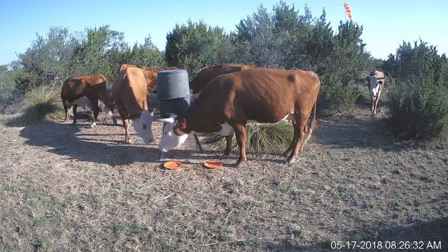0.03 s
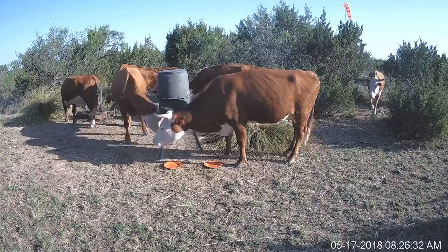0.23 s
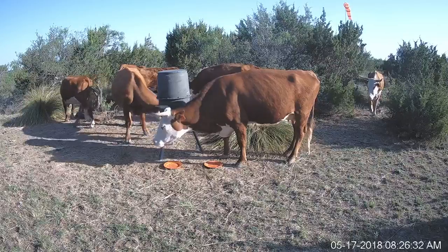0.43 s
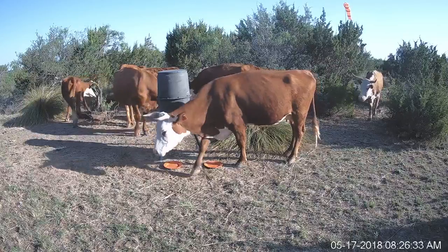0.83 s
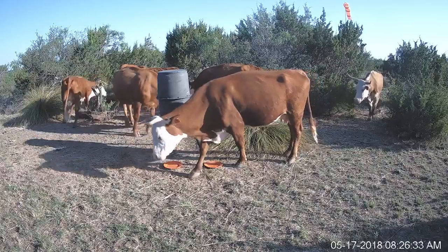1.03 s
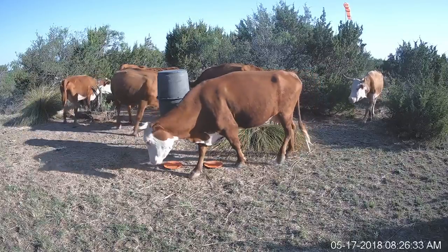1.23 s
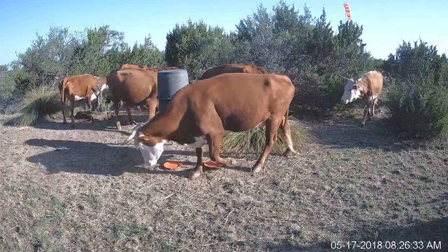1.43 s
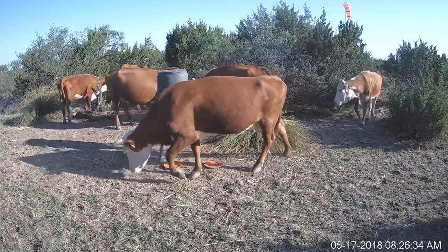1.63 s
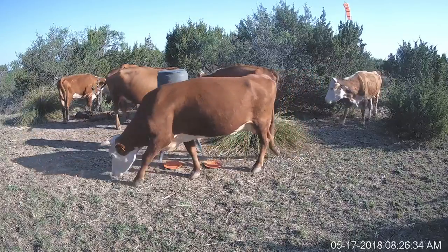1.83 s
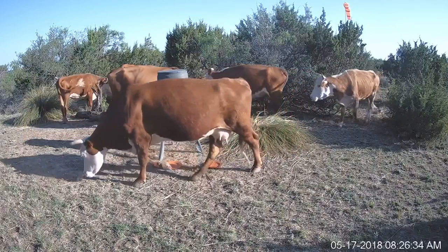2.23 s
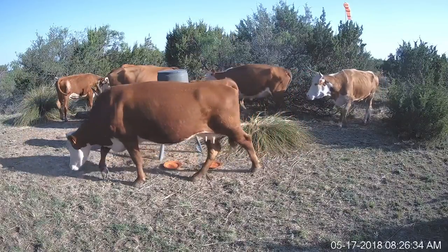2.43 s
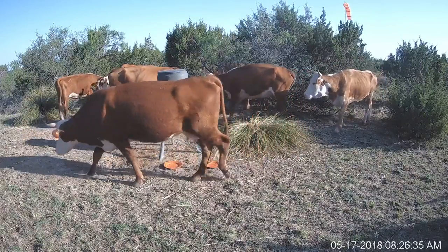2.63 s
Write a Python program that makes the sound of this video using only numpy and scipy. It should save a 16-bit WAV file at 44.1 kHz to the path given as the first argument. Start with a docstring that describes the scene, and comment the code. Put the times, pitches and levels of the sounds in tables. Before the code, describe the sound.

Repeated high bird whistles outdoors, with cattle stepping on stones and dry grass.

```python
"""A small bird repeats an arched whistle from the scrub round a dry pasture; the bushes scatter it back.
Fainter chirps come from deeper in. Cattle shift about close by: hooves knock on stones, thud on the soil
and drag through dry litter, and stalks tick. Under it, quiet open air and the hiss of a mono microphone."""
import sys
import numpy as np
from scipy import signal
from scipy.fft import rfft, irfft, next_fast_len
from scipy.io import wavfile
from scipy.ndimage import uniform_filter1d

SR = 44100
rng = np.random.default_rng(int(sys.argv[2]) if len(sys.argv) > 2 else 0)


def wav_record(signal):
    """Record a signal, one row per channel, as 16-bit PCM in the file named by sys.argv[1]."""
    frames = np.transpose(np.atleast_2d(signal))
    bounded = np.clip(frames, -1, 1)
    # unit amplitude maps onto the largest positive 16-bit level
    quanta = np.round(bounded * 32767).astype(np.int16)
    wavfile.write(sys.argv[1], SR, quanta)


N = 123479
T = np.arange(N) / SR

# spectra of air with hiss, stalk ticks and dragged litter (frequency [Hz], relative level [dB])
AIR_SPECTRUM = [(25, 1), (60, 2.5), (100, 5), (200, -8), (400, -6), (800, -5), (1500, -6), (3000, -4),
                (4200, -4), (5200, -9.5), (5850, -7.5), (6500, -15), (10000, -17.5), (16000, -18)]
STALK_SPECTRUM = [(1000, -19), (3000, -8), (5500, 4), (7500, -10), (16000, -20)]
SOIL_SPECTRUM = [(30, 3.5), (120, 1.5), (300, 2), (600, 1.5), (1000, -2.5), (2500, -55), (16000, -78)]
GRIT_SPECTRUM = [(100, -32), (600, -14), (1300, 0), (2000, 1), (3000, -7.5), (3900, -14), (4700, -4),
                 (5800, -7), (6800, -16), (16000, -41)]
GRASS_SPECTRUM = [(300, -19), (2000, -1.5), (3800, 8), (5500, 0), (7500, -8), (10000, -17), (16000, -24)]
# hoof drags (time of peak pressure [s], rise [s], fall [s], soil [dB], grit [dB], grass [dB])
HOOF_DRAGS = [(0.149, 0.061, 0.022, -63.5, -67, -44.5), (.05, 0.062, 0.076, -64, -62, -66),
              (.29, 0.15, 0.19, -64, -65, -68), (.45, 0.077, 0.036, -58, -60, -75),
              (.865, 0.053, 0.082, -60.5, -62, -57.5), (1.04, 0.039, 0.033, -61, -58, -58),
              (1.24, 0.25, 0.18, -56.5, -52.5, -63), (1.39, 0.12, 0.1, -52, -52, -62.5),
              (1.57, 0.14, 0.28, -62.5, -64.5, -78), (1.78, 0.028, 0.02, -64.5, -57, -54.5),
              (1.847, 0.043, 0.068, -62.5, -61, -58.5), (2.2, 0.12, 0.14, -57, -57, -57),
              (2.32, 0.079, 0.12, -55, -59.5, -61.5), (2.57, 0.091, 0.11, -74, -62, -61),
              (2.674, 0.011, 0.029, -63, -53.5, -58), (2.78, 0.055, .08, -61, -61.5, -85)]
# distant chirps (start [s], length [s], first pitch [Hz], last pitch [Hz], level [dB])
FAR_CHIRPS = [(0.033, 0.041, 4030, 3980, -61), (0.17, 0.053, 4160, 4030, -58),
              (0.37, 0.018, 4020, 3750, -61), (0.467, 0.026, 3250, 2740, -57),
              (.735, 0.036, 3070, 2770, -56.5), (2.356, 0.053, 3040, 2880, -57.5),
              (2.692, 0.044, 2470, 2500, -61.5), (2.681, 0.042, 4420, 4440, -63.5)]
# hoof knocks and snapping twigs (time [s], level [dB], pitch [Hz], T60 [s], relative snap level [dB])
HOOF_KNOCKS = [(.0430, -35, 1180, 0.0037, -20), (0.0932, -46, 1590, 0.0021, -3),
               (0.1374, -39, 1010, 0.0097, -4.5), (0.2195, -40.5, 1700, 0.0034, -15),
               (0.4407, -32.5, 750, 0.0059, -22), (0.4502, -16.5, 1620, 0.0023, -39),
               (0.4823, -32, 1200, 0.0011, -18), (0.552, -51, 6000, 0.0015, -12),
               (0.5926, -40.5, 1470, 0.0027, -9), (0.6402, -35.5, 1360, 0.0061, -13),
               (0.667, -39.5, 1350, 0.0054, -18), (0.6794, -34.5, 1820, 0.0083, -6.5),
               (0.697, -43, 1920, 0.0027, -7), (0.7125, -28, 1490, 0.0012, -16),
               (.7510, -34, 3300, 0.0029, 2), (0.766, -47, 3020, .002, -8),
               (0.861, -29.5, 1690, 0.0035, -11), (0.9372, -16.5, 1255, 0.0043, -11),
               (1.2025, -31.5, 2320, 0.0044, -7), (1.2715, -35, 2130, 0.01, -25),
               (1.4942, -27, 1339, 0.0025, -30), (1.577, -38.5, 1780, 0.0017, -11),
               (1.6004, -35.5, 1520, 0.0032, -16), (1.776, -44.5, 1480, 0.0043, -3),
               (1.7958, -38, 1400, 0.0064, -15), (1.951, -44, 5060, 0.0035, -13),
               (1.970, -44, 6160, 0.0012, -11), (2.1411, -25, 1450, 0.0016, -18),
               (2.3155, -36, 3036, 0.004, -6), (2.458, -43, 6495, .003, 0), (2.672, -43.5, 1330, 0.0055, 2)]
# heavy footfalls (time [s], level [dB], pitch [Hz], T60 [s])
HOOF_THUDS = [(0.153, -40, 559, 0.046), (0.4818, -42, 377, 0.027), (.638, -45, 655, 0.012),
              (.8620, -37, 341, .045), (.866, -50, 84.7, 0.05), (1.203, -44.5, 610, 0.013),
              (1.535, -48.5, 203.5, 0.032), (1.660, -48.5, 106, 0.045), (2.217, -45, 280, 0.054),
              (2.220, -47, 136, 0.049), (2.757, -51.5, 302, 0.044), (2.779, -52.5, 330, 0.053)]
# opening warble (time [s], pitch [Hz], level [dB])
OPENING_WARBLE = [(.176, 3030, -60), (.185, 3320, -49), (.195, 3514, -42), (.205, 3357, -45),
                  (.213, 2846, -46), (.222, 3098, -47.5), (.230, 3368, -43), (.242, 3090, -44),
                  (.253, 3190, -48), (.263, 3506, -41), (.273, 2810, -55)]
# arched whistles (start [s], length [s], level [dB], top pitch [Hz], relative echo level [dB])
WHISTLES = [(0.83, 0.071, -38.5, 3543, -18), (1.401, 0.085, -41.5, 3539, -17),
            (1.91, .079, -42.5, 3444, -7), (2.423, 0.077, -39.5, 3467, -3.5)]
# shape of one whistle (position [share of length], pitch [ratio to top], relative level [dB])
WHISTLE_SHAPE = [(0, .86, -9.5), (.15, .84, -3.5), (.31, .895, -1), (0.45, 0.98, -6.5), (.62, 1, -10.5),
                 (.76, 1, -2.5), (.885, 0.75, -3), (1, 0.64, -5)]

SCRUB_T60_S, CUTOFF_HZ = 0.19, 15850


def amp(db):
    """Decibels to gain."""
    return 10 ** (np.asarray(db) / 20)


def unit(x):
    """Scale to rms 1."""
    return x / np.sqrt(np.mean(x ** 2))


def add(out, start_s, x):
    """Mix x into out at start_s."""
    i = int(round(start_s * SR))
    out[i:i + len(x)] += x[:max(N - i, 0)]


def decay(t, t60_s):
    """Exponential fall, 60 dB in t60_s."""
    return np.exp(-np.log(1000) * t / t60_s)


def bandpass(x, low_hz, high_hz, order=2):
    """Butterworth band-pass."""
    return signal.lfilter(*signal.butter(order, [low_hz, high_hz], "band", fs=SR), x)


def colour(x, spectrum):
    """Filter x by a spectrum; rms 1."""
    hz, db = np.array(spectrum).T
    size = next_fast_len(N, True)
    bin_hz = np.maximum(np.fft.rfftfreq(size, 1 / SR), 1)
    gain = amp(np.interp(np.log(bin_hz), np.log(hz), db))
    return unit(irfft(rfft(x, size) * gain)[:N])


def wander(rate_hz):
    """Smooth random curve; rms 1."""
    hold = int(SR / rate_hz)
    steps = np.repeat(rng.standard_normal(N // hold + 1), hold)
    return unit(uniform_filter1d(uniform_filter1d(steps, hold), hold)[:N])


def flicker(x, depth_db, rate_hz=45):
    """Each half octave from bass to upper treble wavers in level on its own."""
    octave = np.log2(np.maximum(np.fft.rfftfreq(N, 1 / SR), 1) / 60)
    spectrum, out = rfft(x), x.copy()
    for centre in np.arange(15) / 2:
        band = irfft(spectrum * np.maximum(1 - 2 * np.abs(octave - centre), 0), N)
        out += band * (amp(depth_db * wander(rate_hz)) - 1)
    return out


def tail(x, t60_s, build_s):
    """Diffuse reflections that build up and die away."""
    t = T[:SR]
    response = rng.standard_normal(SR) * decay(t, t60_s) * (1 - np.exp(-(t / build_s) ** 2))
    return signal.fftconvolve(x, response / np.linalg.norm(response))[:N]


def air(level_db=-59, swell_db=0.5):
    """Outdoor hush and microphone hiss, wavering slightly."""
    hush = flicker(colour(rng.standard_normal(N), AIR_SPECTRUM), depth_db=2.14)
    return hush * amp(level_db + swell_db * wander(11.98))


def stalks(level_db=-72, ticks_per_s=70, spread_db=3.5):
    """Dry stalks tick at random under the herd."""
    hits = rng.random(N) < ticks_per_s / SR
    ticks = hits * amp(spread_db * np.minimum(rng.exponential(size=N), 3))
    return amp(level_db) * colour(tail(ticks, t60_s=0.02, build_s=0.00066), STALK_SPECTRUM)


def drags(grains_per_s=4000, spread_db=3.5, jitter_db=1.24):
    """Dragging hooves crush soil, grit and dry grass: dense grains that follow the pressure."""
    out = np.zeros(N)
    for k, spectrum in enumerate((SOIL_SPECTRUM, GRIT_SPECTRUM, GRASS_SPECTRUM)):
        hits = (rng.random(N) < grains_per_s / SR) * rng.choice([-1, 1], N)
        grains = hits * amp(spread_db * np.minimum(rng.exponential(size=N), 5))
        power = np.zeros(N)
        for peak_s, rise_s, fall_s, *material_db in HOOF_DRAGS:
            width_s = np.where(T < peak_s, rise_s, fall_s)
            power += amp(material_db[k]) ** 2 * np.exp(-np.pi * ((T - peak_s) / width_s) ** 2)
        out += colour(grains, spectrum) * np.sqrt(power) * amp(jitter_db * wander(60))
    return flicker(out, depth_db=2)


def note(times_s, hz, db, waver=0.01, overtone_db=-32.5, edge_s=0.0058):
    """Nearly pure whistle gliding through the given pitches and levels."""
    pitch_hz = uniform_filter1d(np.interp(T, times_s, hz), size=220) * (1 + waver * wander(250))
    phase = 2 * np.pi * np.cumsum(pitch_hz) / SR
    tone = np.sin(phase) + amp(overtone_db) * np.sin(2 * phase)
    gate = np.clip(np.minimum(T - times_s[0], times_s[-1] - T) / edge_s + 0.5, 0, 1)
    return np.sqrt(2) * gate * amp(np.interp(T, times_s, db)) * tone


def far_birds(direct_db=-7, wash_db=-2):
    """Short unsteady chirps, blurred by the bushes."""
    song = sum(note([start_s, start_s + length_s], [first_hz, last_hz], [db, db], waver=0.0253)
               for start_s, length_s, first_hz, last_hz, db in FAR_CHIRPS)
    return amp(direct_db) * song + amp(wash_db) * tail(song, t60_s=0.034, build_s=0.0017)


def ring(hz, t60_s, contact_s):
    """Damped resonance, steady or moving in pitch, excited by a short push; peak 1."""
    t = T[:SR // 8]
    phase = 2 * np.pi * np.cumsum(np.broadcast_to(hz, N)[:len(t)]) / SR
    mode = np.sin(phase) * decay(t, t60_s) * (1 - np.exp(-(t / contact_s) ** 2))
    return mode / np.abs(mode).max()


def knock(hz, t60_s, snap_db, snap_s=0.00073, crumble_db=-13, crumble_s=0.004):
    """Hoof on stone or twig: a dry ring and a brittle snap that crumbles away."""
    top_hz = min(1.97 * hz, CUTOFF_HZ)  # the soft hoof dulls the top
    body = bandpass(ring(hz, t60_s, contact_s=0.00025), 520, top_hz)
    t = T[:len(body)]
    snap = bandpass(rng.standard_normal(len(t)), 2500, 5500, order=3)
    snap *= np.exp(-t / snap_s) + amp(crumble_db) * np.exp(-t / crumble_s)
    return body + amp(snap_db) * snap / np.abs(snap).max()


def thud(hz, t60_s, wobble=0.065, crush_db=-5):
    """Heavy footfall: a dull, unsteady ring and the noise of crushed soil."""
    body = ring(hz * (1 + wobble * wander(183)), t60_s, contact_s=0.0016)
    t = T[:len(body)]
    crush = bandpass(rng.standard_normal(len(t)), 170, 706) * decay(t, t60_s)
    return body + amp(crush_db) * crush / np.abs(crush).max()


def hooves(bounce_db=-19, bounce_s=0.001976, ground_db=-13, scrub_db=-22):
    """Knocks and thuds, scattered by ground and scrub."""
    out = np.zeros(N)
    for start_s, db, hz, t60_s, snap_db in HOOF_KNOCKS:
        add(out, start_s, amp(db) * knock(hz, t60_s, snap_db))
    out += amp(bounce_db) * np.interp(T - bounce_s, T, out)  # the ground mirrors each knock
    for start_s, db, hz, t60_s in HOOF_THUDS:
        add(out, start_s, amp(db) * thud(hz, t60_s))
    ground = amp(ground_db) * tail(out, t60_s=0.031, build_s=0.0026)
    scrub = amp(scrub_db) * tail(out, SCRUB_T60_S, build_s=0.02)
    return out + ground + scrub


def bird(lead_s=0.0397, gap_s=0.0058, echo_s=0.01684, scrub_db=-5, far_db=-8.5):
    """A warble, then arched whistles, each after a thin lead note; the bushes add echo and wash."""
    song, echoes = note(*np.array(OPENING_WARBLE).T), np.zeros(N)
    position, pitch_ratio, shape_db = np.array(WHISTLE_SHAPE).T
    for start_s, length_s, db, top_hz, echo_db in WHISTLES:
        arch = note(start_s + length_s * position, top_hz * pitch_ratio, db + shape_db)
        lead = note([start_s - lead_s, start_s - gap_s], hz=[3850, 3700], db=[-55, -49])
        song += lead + arch
        add(echoes, echo_s, amp(echo_db) * arch)
    smeared_echoes = tail(echoes, t60_s=0.035, build_s=0.005)
    scrub = amp(scrub_db) * tail(song, SCRUB_T60_S, build_s=0.0077)
    far_wash = amp(far_db) * tail(song, t60_s=0.92, build_s=0.032)
    return song + smeared_echoes + scrub + far_wash


def scene():
    """One microphone, the same in both channels."""
    mono = bird() + far_birds() + hooves() + drags() + stalks() + air()
    return np.tile(mono, (2, 1))


def record(dry):
    """The recorder's steep low-pass."""
    return signal.sosfilt(signal.ellip(10, 0.2, 70, CUTOFF_HZ, fs=SR, output="sos"), dry)


dry = scene()
out = record(dry)
wav_record(out)
```